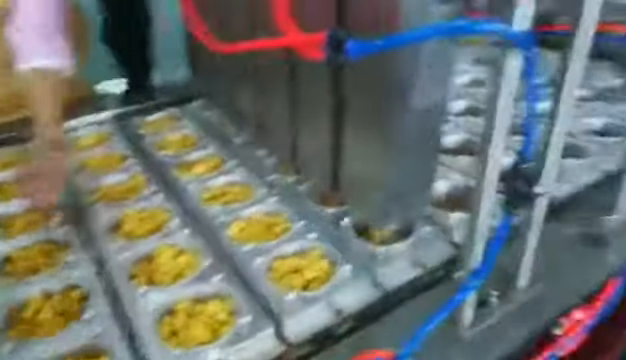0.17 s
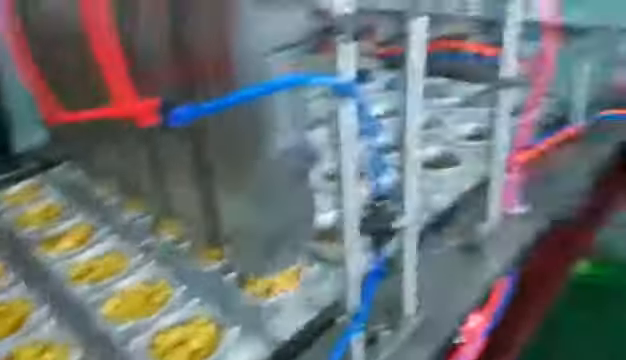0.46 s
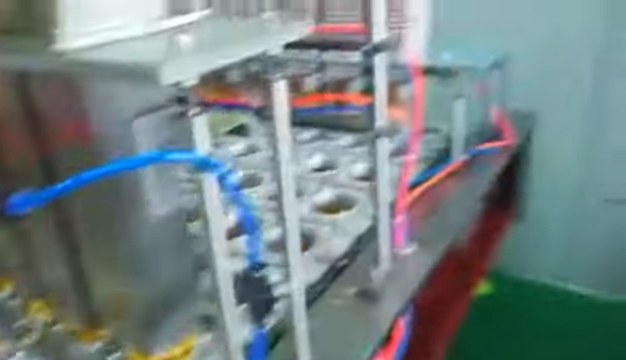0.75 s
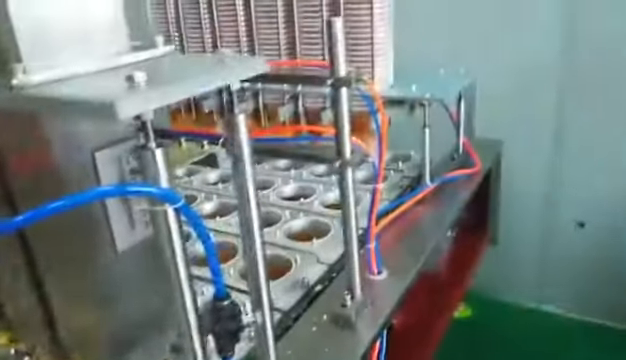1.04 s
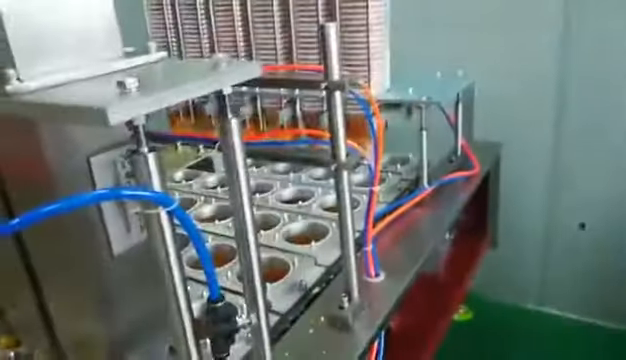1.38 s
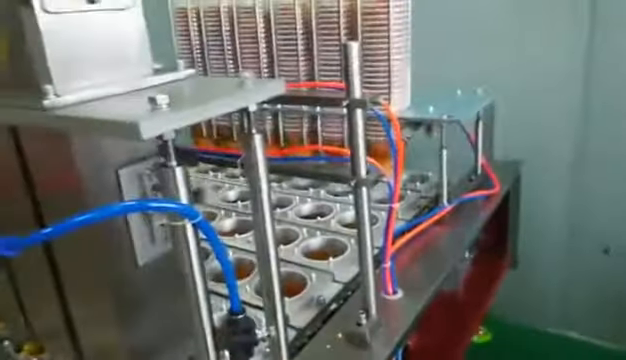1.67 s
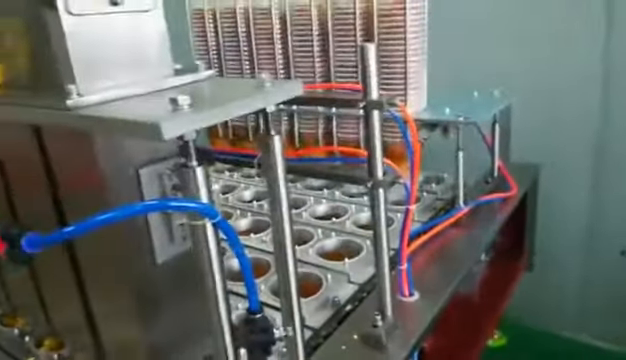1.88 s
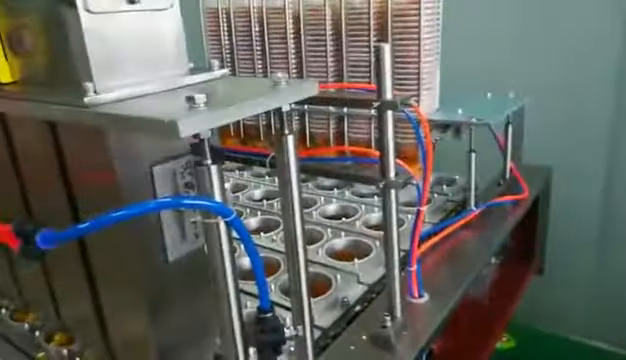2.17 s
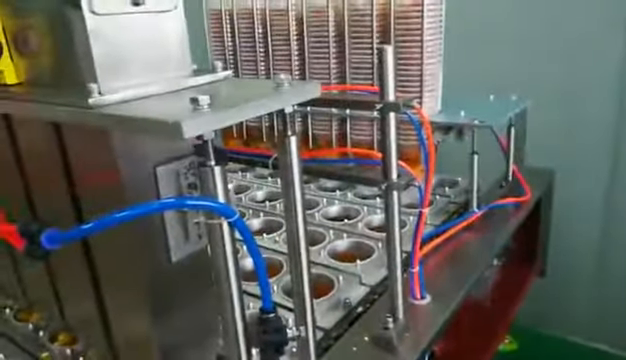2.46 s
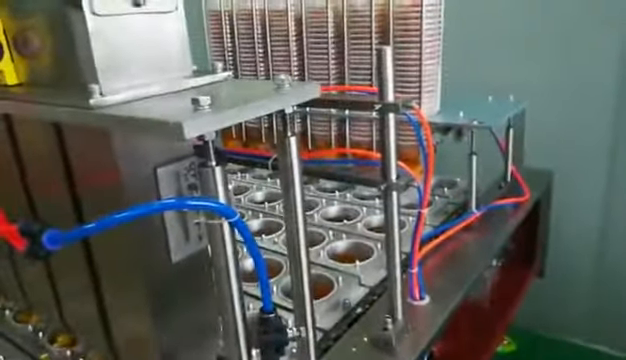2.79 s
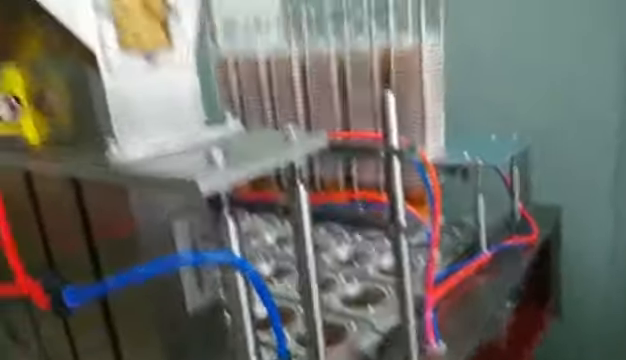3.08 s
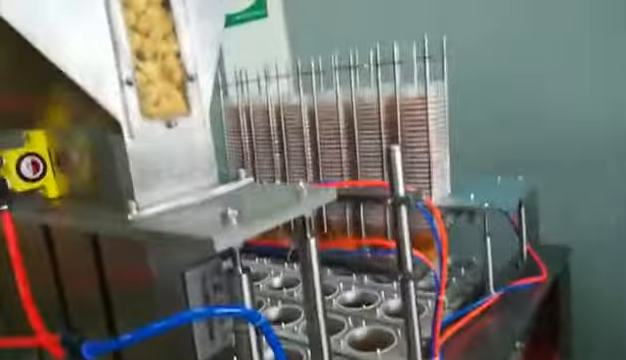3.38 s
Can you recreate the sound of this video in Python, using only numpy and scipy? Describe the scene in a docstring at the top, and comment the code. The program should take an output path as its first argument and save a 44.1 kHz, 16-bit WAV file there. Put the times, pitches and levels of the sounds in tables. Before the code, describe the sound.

An air-driven filling machine hisses loudly, with clattering pieces and a ringing metal slam.

```python
"""Loud hisses of air, a clatter and a ringing slam: one cycle of an air-driven cup-filling machine. Small
pieces tumble down a chute, then a tray conveyor rumbles forward and hits its stop, ringing the steel frame. Air
cylinders empty with falling whistles and small valves puff. Thin rods jingle and a dull thud hums briefly, over
a steady air leak and the drone of a hard-walled factory room."""
import sys
import numpy as np
from scipy import signal
from scipy.fft import rfft, irfft
from scipy.io import wavfile
from scipy.ndimage import map_coordinates

SR = 44100
rng = np.random.default_rng(int(sys.argv[2]) if len(sys.argv) > 2 else 0)


def persist_wave(psi):
    """Save psi, clipped to +-1, as 16-bit WAV."""
    counts = np.round(np.clip(psi, -1, 1) * 32767).astype(np.int16)
    wavfile.write(sys.argv[1], SR, np.atleast_2d(counts).T)


N = 156114
T = np.arange(N) / SR
HZ = np.maximum(np.arange(N // 2 + 1) * SR / N, 1)

# air rushing from the second cylinder, the long vent (time [s], level [dB])
VENT_FLOW = [(1.93, -65), (1.965, -29), (2.05, -22), (2.14, -18.5), (2.3, -24), (2.45, -26.5), (2.7, -25.5),
             (2.85, -28.5), (3.1, -26.5), (3.4, -22.5), (3.54, -23.5)]
# where the vent's treble sits as the listener moves (time [s], left minus right [dB])
VENT_PAN = [(2.1, 2), (2.4, -1.5), (2.7, -5.5), (2.97, -4.5), (3.2, -2.5), (3.54, 0)]
VENT_TREBLE_HZ = 5200
# the tone of metal scraping or clanking (frequency [Hz], relative level [dB])
CLANK_SPECTRUM = [(100, -25.5), (350, -10.5), (480, -7), (750, -3), (1000, -3.5), (1150, 0.5), (1300, 0),
                  (1800, -0.5), (2350, 1), (2900, -8.5), (5000, -6), (7600, -36)]


def exhausts():
    """Air rushes out of two cylinders: a short hard blast, then a long vent."""
    # air rushing from the first cylinder (time [s], level [dB])
    blast_flow = [(1.135, -48.5), (1.18, -12.5), (1.25, -15.5), (1.36, -18), (1.48, -18), (1.54, -27),
                  (1.62, -35), (1.7, -76)]
    # the tone of each hiss (frequency [Hz], relative level [dB])
    blast_spectrum = [(500, -24.5), (1200, -34), (2100, 0.5), (2800, -3.5), (4200, 2), (5400, 3), (6600, 1),
                      (7600, -5.5)]
    vent_spectrum = [(600, -37), (1500, -7), (2200, 0.5), (2430, -1), (2700, 1), (3050, 0.5), (3700, 0.5),
                     (4500, 4), (5500, 7), (5950, 8.5), (6550, -9.5), (7000, 9.5), (7600, -4)]
    blast = from_db(in_time(blast_flow)) * noise(blast_spectrum)
    vent = noise(vent_spectrum)
    treble = irfft(rfft(vent) / (1 + (VENT_TREBLE_HZ / HZ) ** 20), N)
    return blast + from_db(in_time(VENT_FLOW)) * (vent - treble + treble * pan(in_time(VENT_PAN)))


def falling_whistles():
    """As each cylinder loses pressure, its whistle sinks and fades ever faster."""
    # whistles (start [s], first pitch [Hz], last pitch [Hz], sinking time [s], width [Hz],
    # level [dB], fade time before the speed-up [s])
    whistles = [(1.165, 6800, 3400, .118, 160, -18.5, 1.6), (1.95, 6850, 5500, .25, 420, -27, 2.0)]
    out = 0
    for start, first_hz, last_hz, sink_s, width_hz, db, fade_s in whistles:
        age = np.maximum(T - start, 0)
        hz = last_hz + (first_hz - last_hz) * np.exp(-age / sink_s)
        speed_up = 1 + age / .24
        out += from_db(db) * decay(start, .0047, fade_s) ** speed_up * fluttering_tone(hz, width_hz)
    return out


def vent_whistles():
    """The long vent sings with wavering tones and squeals once."""
    # tones in the air stream (pitch [Hz], width [Hz], level relative to the vent [dB])
    tones = [(2720, 220, -15), (4500, 140, -18), (5030, 150, -17), (5920, 170, -11), (6500, 280, -10)]
    out = 0
    for hz, width_hz, db in tones:
        tone = fluttering_tone(hz * (1 + .015 * drift(per_s=7)), width_hz)
        waver_db = 7 * drift(per_s=14)
        lean = pan(in_time(VENT_PAN)) if hz > VENT_TREBLE_HZ else 1
        out += from_db(in_time(VENT_FLOW) + db + waver_db) * tone * lean
    # the squeal (time [s], half-length [s], pitch [Hz], width [Hz], level [dB], left minus right [dB])
    squeal = (2.96, .018, 5990, 200, -23, -10)
    time, half_s, hz, width_hz, db, pan_db = squeal
    return out + from_db(db) * pan(pan_db) * swell(time, half_s) * fluttering_tone(hz, width_hz)


def valve_puffs():
    """Valves switch with brief spits of air."""
    # puffs (time [s], level [dB], half-length [s], left minus right [dB])
    puffs = [(0.19, -31.5, 0.033, -12), (0.778, -16.5, 0.014, -7.5), (1.684, -16, .022, 1),
             (2.144, -27, 0.0091, 6), (2.486, -17, 0.01, 4)]
    # their hiss (frequency [Hz], relative level [dB])
    spectrum = [(1000, -54.5), (2800, -8), (4000, -3), (5200, 0), (6000, 2), (7600, -1.5)]
    bursts = sum(from_db(db) * pan(pan_db) * swell(time, half_s) for time, db, half_s, pan_db in puffs)
    return bursts * noise(spectrum)


def knocks():
    """Each blow rings the frame and adds a low thud and a grainy clank."""
    # blows (time [s], ring [dB], thud [dB], clank [dB], rise time [s], fade time [s])
    blows = [(0.047, -35, -52, -65.5, .003, 0.074), (0.772, -47, -29, -32, .002, 0.12),
             (1.472, -35, -33.5, -38, 0.0014, 0.056), (1.643, -30, -42, -22, 0.0032, 0.088),
             (1.653, -16.5, -30.5, -14.5, 0.0024, 0.15), (1.672, -13.5, -37, -16, 0.0018, .11),
             (1.686, -22, -34.5, -32, 0.0025, 0.19), (1.744, -47.5, -32.5, -53, 0.0057, .22),
             (1.926, -29.5, -55.5, -25, 0.006, 0.93), (1.956, -27, -56.5, -48, 0.0051, .25),
             (2.132, -48.5, -58.5, -21, 0.011, 0.53), (2.471, -45, -36, -26, 0.0016, 0.11),
             (2.562, -39, -30, -23, 0.013, 0.24)]
    # the thud's tone (frequency [Hz], relative level [dB])
    thud_spectrum = [(25, -16.5), (70, -11), (160, -6.5), (320, -12.5), (500, -7.5), (1200, -32.5),
                     (8000, -67.5)]
    times, ring_db = np.transpose(blows)[:2]
    ringing = room(steel_frame(times, ring_db) * pan(db=-1.7))
    thud_power = clank_power = 0
    for start, _, thud_db, clank_db, rise_s, fade_s in blows:
        tail = from_db(-9.5) * decay(start, rise_s=.015, fade_s=1)
        power = decay(start, rise_s, fade_s) ** 2 + tail ** 2
        thud_power += from_db(thud_db) ** 2 * power
        clank_power += from_db(clank_db) ** 2 * power
    thud = np.sqrt(thud_power) * noise(thud_spectrum)
    clank = np.sqrt(clank_power) * colour(grains(per_s=5400, spread_db=3), CLANK_SPECTRUM)
    return hollow(ringing + thud + clank)


def steel_frame(times, ring_db):
    """Struck steel rings at its own pitches, and loose parts chatter on after each blow."""
    # the frame's notes (pitch [Hz], level [dB], fade time [s])
    notes = [(165, -24, 0.34), (310, -11.5, 0.093), (339, -4, .2), (370, -12, 0.17), (661, -16, 0.28),
             (721, -7, .17), (768.4, -1.5, 0.16), (827, -3, 0.091), (879, -11, 0.28), (938, -1, 0.13),
             (989, -2.5, .09), (1021.5, -3, 0.13), (1334, -12, 0.15), (1460, -30.5, .3), (1737, -18, 0.34),
             (1850, -20.5, 0.12), (2260, -36.5, .2)]
    shake_power = sum((from_db(db - 22.5) * decay(start, rise_s=.005, fade_s=.66)) ** 2
                      for start, db in zip(times, ring_db))
    rattle = np.sqrt(shake_power) * grains(per_s=460, spread_db=1.5)
    out = 0
    for hz, db, fade_s in notes:
        strengths = from_db(ring_db + rng.standard_normal(len(times)))
        hits = clicks(times, strengths * rng.choice([-1, 1], len(times)))
        out += from_db(db) * ring(hits + rattle, hz, fade_s)
    return out


def hollow(x):
    """The frame gives off little sound between its groups of notes."""
    # quiet gaps (frequency [Hz], width [Hz])
    gaps = [(520, 110), (1150, 93)]
    for hz, width_hz in gaps:
        x = signal.lfilter(*signal.iirnotch(hz, hz / width_hz, fs=SR), x)
    return x


def chute():
    """Small pieces clatter down a chute, with a sharp double tink."""
    # the pour (time [s], level [dB])
    pour = [(0, -35), (.1, -33.5), (.135, -26.5), (.215, -22.5), (.28, -26.5), (.37, -32.5), (.5, -41.5),
            (.7, -76.5)]
    # the chute's tone (frequency [Hz], relative level [dB])
    spectrum = [(80, -26), (290, -3), (380, -7.5), (580, -2), (800, -12), (1100, -1.5), (1750, -5),
                (2120, 2), (2450, -7), (2700, -11.5), (3500, -16), (4500, -7), (7600, -19)]
    # two sharp hits (time [s], level [dB])
    hits = [(.192, -15), (.195, -6.5)]
    # the notes they ring (pitch [Hz], level [dB], fade time [s])
    notes = [(2150, -4.5, 0.026), (2390, -13.5, 0.054), (2970, -15, 0.021)]
    times, hit_db = np.transpose(hits)
    tinks = sum(ring(clicks(times, from_db(hit_db + db)), hz, fade_s) for hz, db, fade_s in notes)
    clatter = from_db(in_time(pour)) * colour(grains(per_s=1200, spread_db=-2), spectrum)
    return clatter + room(tinks * pan(db=0))


def conveyor():
    """Trays slide on rails: many tiny slips scrape and make them ring."""
    # how hard the conveyor works (time [s], level [dB])
    effort = [(.70, -46), (.78, -34.5), (.95, -32.5), (1.15, -30), (1.4, -30), (1.58, -30), (1.61, -36.5),
              (1.7, -41), (1.9, -84)]
    # the trays' notes (pitch [Hz], width [Hz], relative level [dB])
    notes = [(157.6, 28, -5.5), (241, 45, -2), (283, 47, 1.5), (323, 29, -2), (382, 15, -10),
             (500, 42, -11), (1092, 25, -8), (1248, 10, -8.5), (1472, 14, -4), (1790, 77, -8.5),
             (1850, 48, -18), (1970, 170, -8)]
    slips = two_ears(grains(per_s=900, spread_db=3))
    trays = 0
    for k, (hz, width_hz, db) in enumerate(notes):
        fade_s = np.log(1000) / (np.pi * width_hz)  # a wider note dies sooner
        trays += (-1) ** k * from_db(db) * rms_one(ring(slips, hz, fade_s))
    scrape = from_db(-4.5) * colour(slips, CLANK_SPECTRUM)
    return from_db(in_time(effort)) * (rms_one(trays) + scrape)


def guide_rods():
    """Thin steel rods are touched at random and ring briefly."""
    # the growing jingle (time [s], level [dB])
    jingle = [(2.3, -50.5), (2.5, -45.5), (2.8, -38), (3.1, -37.5), (3.3, -35), (3.54, -32)]
    # the rods' notes (pitch [Hz], relative level [dB], fade time [s])
    notes = [(2460, -5, 0.087), (2780, -2, 0.11), (3010, 1, 0.12), (3370, 1.5, 0.17), (3510, -5, 0.1),
             (3770, 1.5, 0.19), (4160, -10, 0.16), (4670, -13, 0.064)]
    rings = sum(from_db(db) * ring(grains(per_s=17, spread_db=3), hz, fade_s) for hz, db, fade_s in notes)
    return from_db(in_time(jingle)) * rms_one(rings)


def low_thud():
    """A dull thud hums for a moment, rough and low."""
    # its brief swell (time [s], level [dB])
    hum_level = [(2.29, -73), (2.315, -34), (2.36, -50.5), (2.43, -41.5), (2.5, -51.5)]
    return from_db(in_time(hum_level)) * two_ears(fluttering_tone(hz=150.5, width_hz=55))


def air_leak():
    """Leaking air hisses steadily."""
    # the hiss (frequency [Hz], relative level [dB])
    spectrum = [(800, -40.5), (2000, -12), (3300, -5.5), (4500, -5.5), (5500, 0), (6300, 0), (7600, -5)]
    return from_db(-26.5) * noise(spectrum)


def factory_drone():
    """The factory drones behind everything."""
    # the drone (frequency [Hz], relative level [dB])
    spectrum = [(20, -3), (45, -4.5), (80, 0.5), (150, -0.5), (310, -1), (450, -8), (650, -10.5),
                (780, -4.5), (1200, -3.5), (2100, -3), (3000, -19.5), (8000, -20)]
    return from_db(-39) * noise(spectrum)


def sputter(x, depth_db=2.2, strip_hz=131.7, patch_s=.045):
    """Each narrow strip of pitch in the hiss swells and sinks by chance."""
    hz, times, slices = signal.stft(x, SR, nperseg=1024)
    grid = np.meshgrid(hz / strip_hz, times / patch_s, indexing="ij")
    patches = map_coordinates(rng.standard_normal((300, 200)), grid, order=3, mode="mirror")
    return signal.istft(slices * from_db(depth_db * patches), SR, nperseg=1024)[1][:, :N]


def panel_echoes(x, count=8, longest_s=.016):
    """Quick echoes off steel panels colour the hiss differently in each ear."""
    delays = (rng.uniform(.05, 1, (2, count)) * longest_s * SR).astype(int)
    gain = from_db(-14)
    echoes = np.array([sum(np.roll(ear, delay) for delay in row) for ear, row in zip(x, delays)])
    return (x + gain * echoes) / np.sqrt(1 + count * gain ** 2)


def room(x):
    """Hard walls add a short wash of echoes."""
    tail = two_ears(rng.standard_normal((2, N))) * decay(.012, rise_s=.005, fade_s=.45)
    tail = tail[:, :SR] / np.sqrt(np.sum(tail ** 2) / 2)
    return x + from_db(-7) * signal.fftconvolve(x, tail, axes=1)[:, :N]


def from_db(db):
    """Turn decibels into a multiplier."""
    return 10 ** (np.asarray(db) / 20)


def rms_one(x):
    """Scale to an average strength (rms) of 1."""
    return x / np.sqrt(np.mean(x ** 2) + 1e-20)


def in_time(rows):
    """Read a time table at every sample."""
    return np.interp(T, *np.transpose(rows))


def at_hz(rows):
    """Read a frequency table at every frequency."""
    hz, value = np.transpose(rows)
    return np.interp(np.log(HZ), np.log(hz), value)


def pan(db):
    """Left and right gains; positive dB leans left."""
    gains = from_db(np.array([[.5], [-.5]]) * db)
    return gains / np.sqrt(np.mean(gains ** 2, axis=0))


def two_ears(pair):
    """Two unrelated signals become left and right, alike in the bass."""
    # how alike the ears are (frequency [Hz], likeness [-1 to 1])
    likeness = [(60, .999), (140, .992), (300, .92), (650, .2), (1500, .15), (3400, 0), (7600, .1)]
    mid, side = rfft(pair)
    alike = at_hz(likeness)
    return irfft(np.sqrt(1 + alike) * mid + np.sqrt(1 - alike) * side * [[1], [-1]], N)


def colour(pair, spectrum):
    """Shape a stereo sound's lows and highs; strength 1."""
    return rms_one(two_ears(irfft(rfft(pair) * from_db(at_hz(spectrum)), N)))


def noise(spectrum):
    """Stereo noise with the given tone."""
    return colour(rng.standard_normal((2, N)), spectrum)


def grains(per_s, spread_db):
    """Random tiny contacts of uneven size."""
    sizes = from_db(spread_db * np.minimum(rng.exponential(1, (2, N)), 4))
    return sizes * rng.choice([-1, 1], (2, N)) * (rng.random((2, N)) < per_s / SR)


def clicks(times, gains):
    """A click at each time."""
    out = np.zeros(N)
    out[(np.asarray(times) * SR).astype(int)] = gains
    return out


def ring(x, hz, fade_s):
    """Each click in x rings one note, which drops 60 dB in fade_s."""
    shrink = from_db(-60 / (fade_s * SR))
    turn = 2 * np.pi * hz / SR
    return signal.lfilter([0, np.sin(turn)], [1, -2 * shrink * np.cos(turn), shrink ** 2], x + 1e-18)


def fluttering_tone(hz, width_hz):
    """A breathy stereo tone; more width makes it rougher."""
    smoothing = signal.butter(2, width_hz / 2, fs=SR, output="sos")
    flutter = signal.sosfilt(smoothing, rng.standard_normal((2, 2, N)))
    phase = 2 * np.pi * np.cumsum(hz * np.ones(N)) / SR
    return rms_one(flutter[0] * np.cos(phase) + flutter[1] * np.sin(phase))


def decay(start, rise_s, fade_s):
    """A quick rise, then a fall of 60 dB in fade_s."""
    age = np.maximum(T - start, 0)
    return np.minimum(age / rise_s, 1) * np.exp(-np.log(1000) * age / fade_s)


def swell(time, half_s):
    """A rounded burst centred on the given time."""
    return np.exp(-.5 * ((T - time) / half_s) ** 2)


def drift(per_s):
    """A slow random wander around zero."""
    points = rng.standard_normal(200)
    return np.interp(T * per_s, np.arange(len(points)), points)


def scene():
    """Air, moving parts and drone together; the bass stays centred."""
    # the room's lean to one side (frequency [Hz], left minus right [dB])
    balance = [(400, 0.5), (800, 1), (1100, -1.5), (1500, -4), (2500, -5), (3500, 0), (4600, 2), (6000, -2),
               (7600, -0.5)]
    hiss = panel_echoes(sputter(exhausts() + air_leak()))
    air = hiss + falling_whistles() + vent_whistles() + valve_puffs()
    mix = air + conveyor() + knocks() + guide_rods() + chute() + low_thud() + factory_drone()
    above_bass = HZ > balance[0][0]
    return irfft(rfft(mix) * pan(at_hz(balance) * above_bass), N)


def record(dry, cutoff_hz=7560):
    """Cut the highest treble away steeply."""
    return signal.sosfilt(signal.ellip(18, .1, 80, cutoff_hz, fs=SR, output="sos"), dry)


dry = scene()
out = record(dry)
persist_wave(out)
```